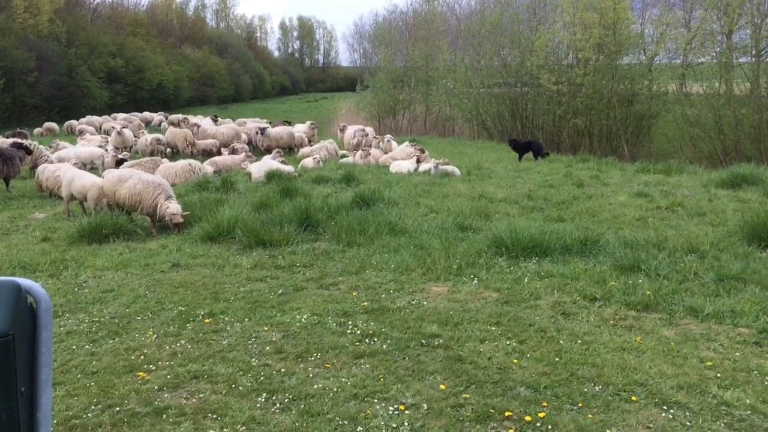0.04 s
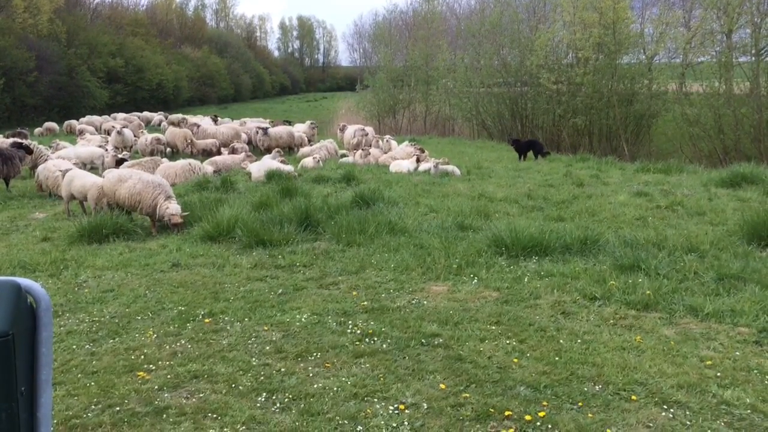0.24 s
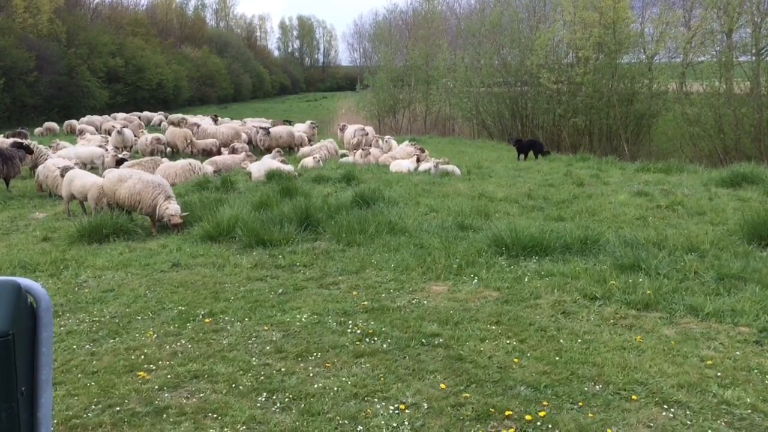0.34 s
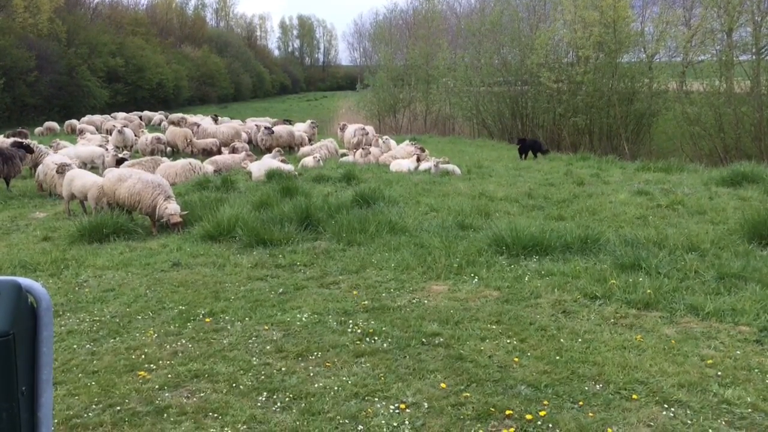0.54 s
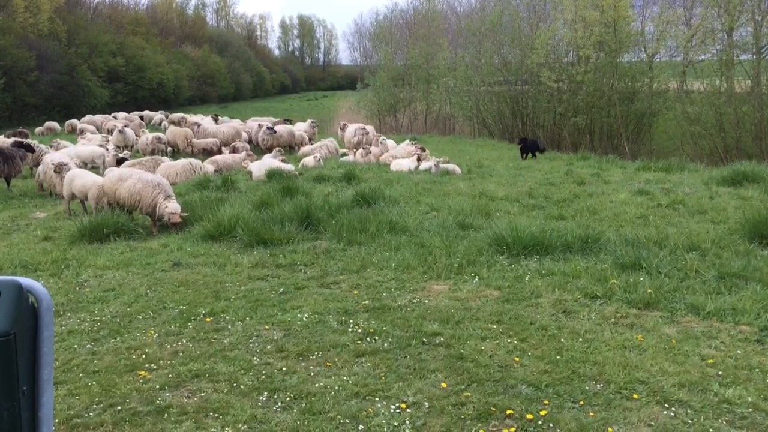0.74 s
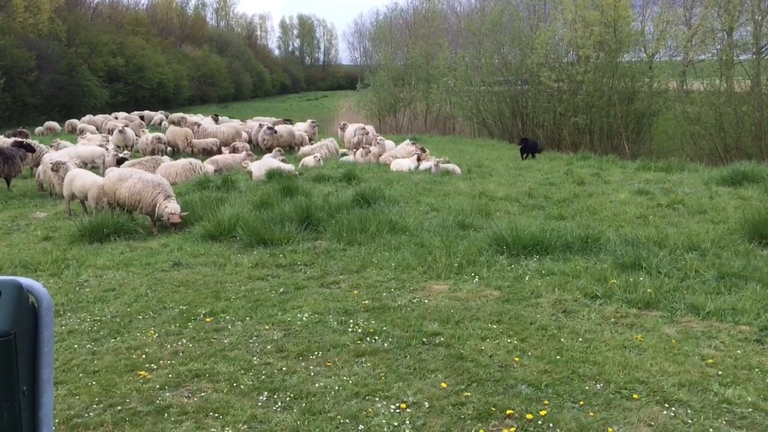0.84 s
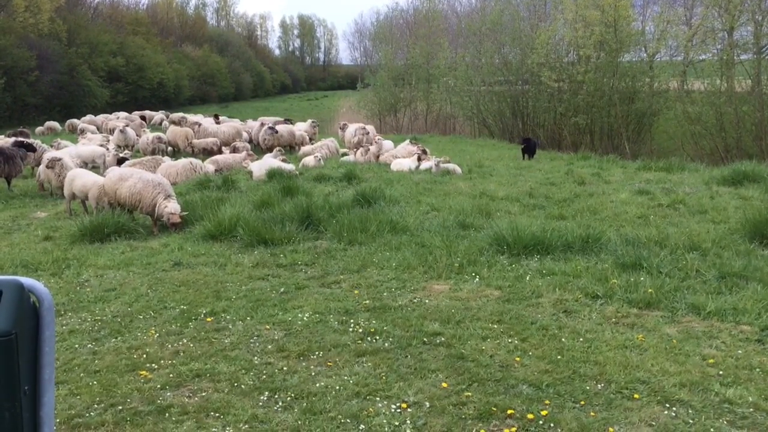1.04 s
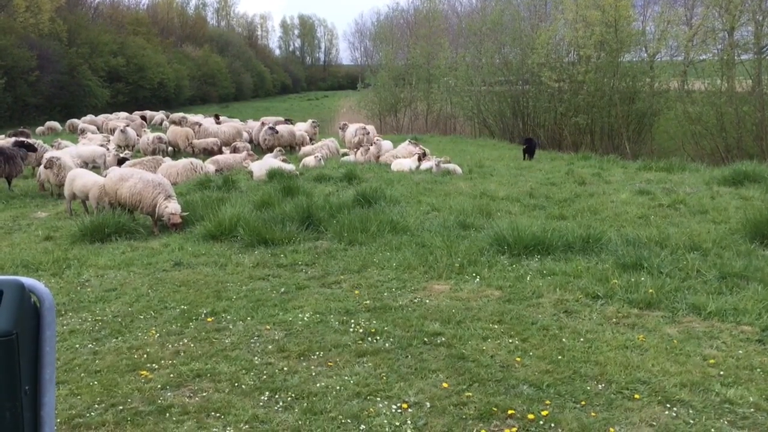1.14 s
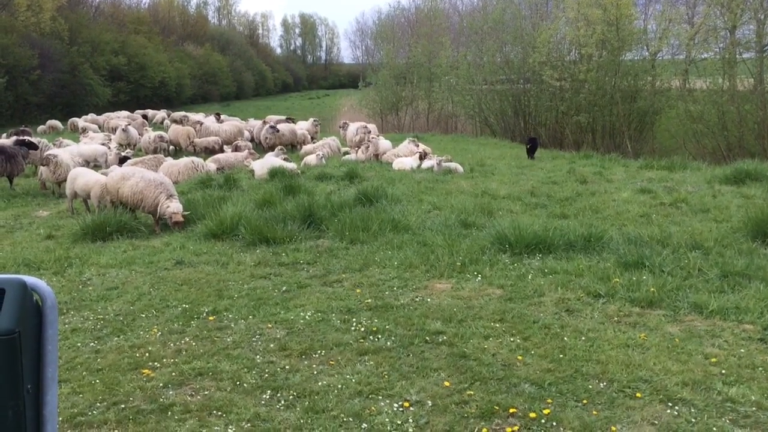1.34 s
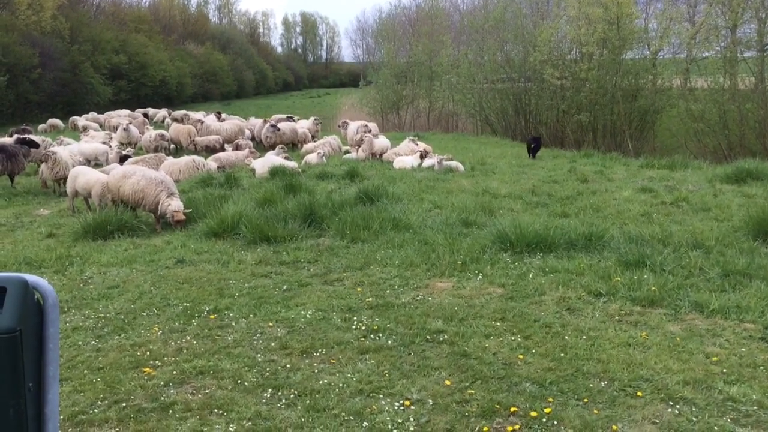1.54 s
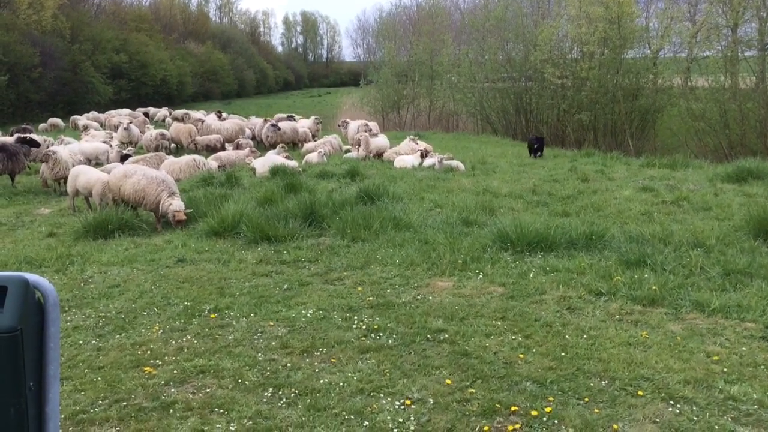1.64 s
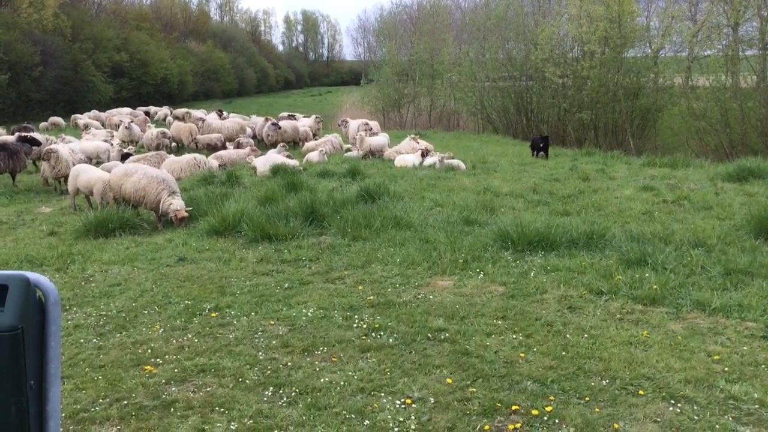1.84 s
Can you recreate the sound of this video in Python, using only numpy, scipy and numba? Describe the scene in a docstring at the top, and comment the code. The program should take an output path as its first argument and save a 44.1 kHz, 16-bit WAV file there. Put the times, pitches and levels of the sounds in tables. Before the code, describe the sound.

One long sheep bleat turns hoarse as it fades in a quiet, breezy meadow.

```python
"""An open meadow, where a sheep gives one long, low bleat.
Sharp pulses from its vocal folds ring three resonances in its throat. The voice is clear and
quavering at first, then breaks into a weaker, hoarse rattle, and the tree line sends back a faint tail.
Light wind rumbles on the microphone, the grass rustles and a far bird chirps."""
import sys
import numpy as np
from scipy import signal
from scipy.io import wavfile
from scipy.ndimage import uniform_filter1d
from numba import njit

SR = 44100
rng = np.random.default_rng(int(sys.argv[2]) if len(sys.argv) > 2 else 0)


def bounce(signal):
    """Save signal as a 16-bit WAV file at the path given by the first command-line argument."""
    frames = np.transpose(np.atleast_2d(signal))
    limited = np.clip(frames, -1, 1)
    pcm = np.round(limited * 32767).astype(np.int16)
    wavfile.write(sys.argv[1], SR, pcm)


N = 83790


def from_db(db):
    """Turn decibels into a number to multiply by."""
    return 10 ** (np.asarray(db) / 20)


def rms_one(x):
    """Scale a signal to an average power of one."""
    return x / np.sqrt(np.mean(x ** 2) + 1e-20)


def seconds():
    """The time of every sample."""
    return np.arange(N) / SR


def in_time(rows):
    """Join a table's rows by straight lines: one curve for each column after the time."""
    times, *columns = np.transpose(rows)
    return [np.interp(seconds(), times, column) for column in columns]


def drift(rate):
    """A random wander of size about one, with a new value `rate` times a second."""
    return rms_one(np.interp(seconds() * rate, np.arange(4000), rng.standard_normal(4000)))


def butter(x, hz, kind, order=2):
    """Keep the lows, the highs or a band; a higher order cuts more steeply."""
    return signal.sosfilt(signal.butter(order, np.clip(hz, 10, .45 * SR), kind, fs=SR, output="sos"), x)


@njit
def glide_filter(x, angle, r):
    """A ringing filter: `angle` sets its pitch, and `r` nearer to one makes it ring longer."""
    y = np.zeros(len(x))
    for i in range(2, len(x)):
        push = (1 - r[i] ** 2) / 2 * (x[i] - x[i - 2])
        y[i] = push + 2 * r[i] * np.cos(angle[i]) * y[i - 1] - r[i] ** 2 * y[i - 2]
    return y


def resonate(x, hz, width_hz):
    """Make a signal ring at a steady or moving frequency; a narrower width rings longer."""
    angle = 2 * np.pi * hz / SR * np.ones(N)
    r = np.exp(-np.pi * np.abs(width_hz) / SR) * np.ones(N)
    return glide_filter(x + 1e-18, angle, r)


# the breeze's tone, from deep rumble to high hiss (frequency [Hz], relative level per Hz [dB])
BREEZE_TONE = [(20, -58), (40, -7.5), (68, 1), (100, -1), (160, -2.5), (250, -8.5), (400, -11), (700, -14),
               (1300, -19), (2200, -25), (4000, -30.5), (6000, -33), (8300, -33), (10000, -37),
               (15000, -40)]


def breeze(level_db=-58.5, flutter_db=0.7):
    """Wind rumbles and leaves hiss: twenty bands of noise, each fluttering gently."""
    edges = 20 * 2 ** (np.arange(21) / 2)
    noise = rng.standard_normal((2, 2 * N))
    hz, db = np.transpose(BREEZE_TONE)
    out = np.zeros(N)
    for k, (low, high) in enumerate(zip(edges, edges[1:])):
        band = butter(noise[k % 2], [low, high], "band")[N:]
        band_db = np.interp(np.log(low * high) / 2, np.log(hz), db)
        out += band * from_db(band_db + flutter_db * drift(20))
    return from_db(level_db) * rms_one(out)


# the tones of a far-off hum (pitch [Hz], level [dB])
HUM_TONES = [(196, -81), (331, -75.5), (395, -76)]


def far_hum():
    """Faint, steady tones whose pitch wanders a little."""
    return sum(from_db(db) * np.sqrt(2) * np.sin(2 * np.pi * np.cumsum(hz + 3 * drift(15)) / SR)
               for hz, db in HUM_TONES)


# the calls of a far bird (time [s], peak level [dB], pitch [Hz])
BIRD_CHIRPS = [(.035, -75, 7500), (.075, -75, 8400), (.355, -76, 6400)]


def bird(half_length_s=0.0092, warble_hz=160):
    """A far bird gives short, very high, warbling whistles."""
    out = np.zeros(N)
    for time, db, hz in BIRD_CHIRPS:
        swell = np.exp(-((seconds() - time) / half_length_s) ** 2)
        pitch = hz + warble_hz * drift(160)
        out += from_db(db) * swell * np.sin(2 * np.pi * np.cumsum(pitch) / SR)
    return out


# stirs in the grass (time [s], level [dB], half length [s], band centre [Hz], top edge / centre [ratio])
GRASS_RUSTLES = [(0.038, -66, 0.0018, 7100, 0.9), (.256, -62.5, 0.0018, 6100, 1.05),
                 (0.253, -80, .03, 8000, 0.93), (0.59, -67, 0.0036, 13000, 2.2),
                 (.692, -70.5, 0.024, 7000, 1.9), (1.134, -70, 0.069, 3560, 1),
                 (1.144, -73, 0.0024, 4358, 1.13), (1.11, -75, 0.032, 12000, 1.3),
                 (1.274, -72, 0.016, 9070, 1.5), (1.359, -70, 0.014, 3000, 0.8),
                 (1.42, -74.5, 0.023, 5467, 1.7), (1.58, -75, 0.0094, 7610, 1),
                 (1.663, -68.5, .002, 6000, 1.9)]


def grass(grain_db=4):
    """The grass rustles in short swells of bright, grainy noise."""
    out = np.zeros(N)
    for time, db, half_length, hz, spread in GRASS_RUSTLES:
        grains = rng.standard_normal(N) * from_db(grain_db * drift(600))
        spread = max(spread, 1.15)
        rustle = rms_one(butter(grains, [hz / spread, hz * spread], "band", order=1))
        swell = np.exp(-((seconds() - time) / half_length) ** 2)
        out += from_db(db) * swell * rustle
    return out


# puffs of wind on the microphone (time [s], peak level [dB])
WIND_PUFFS = [(.108, -49), (0.788, -54), (1.219, -51), (1.36, -49), (1.602, -51.5), (1.77, -47)]


def wind_bumps(pitch_hz=84.6, half_length_s=0.0099):
    """Each puff of wind bumps the microphone, making a brief, low thud."""
    out = np.zeros(N)
    for time, db in WIND_PUFFS:
        t = seconds() - time
        swell = np.exp(-(t / half_length_s) ** 2)
        out += from_db(db) * swell * np.sin(2 * np.pi * (pitch_hz * t + rng.random()))
    return out


BLEAT_START_S, BLEAT_END_S = .185, 1.365
# how fast the sheep's vocal folds pulse (time [s], pitch [Hz])
FOLD_PITCH = [(0.185, 121.7), (0.249, 137.5), (0.271, 135.9), (0.317, 146.8), (0.355, 139.1),
              (0.401, 142.6), (0.437, 139.1), (0.495, 145.3), (0.531, 139.1), (0.589, 146.5),
              (0.625, 135.8), (0.671, 146.9), (0.707, 137.8), (0.751, 144.1), (0.797, 142.3),
              (0.851, 128.5), (0.891, 136.1), (0.903, 134.1), (0.945, 123.7), (0.985, 133.2),
              (1.015, 129.8), (1.049, 136.2), (1.105, 137), (1.173, 134.2), (1.219, 123.5), (1.245, 113.9),
              (1.297, 121.8), (1.35, 115.5)]
# how rough the voice is (time [s], hoarseness [0-1])
HOARSENESS = [(.19, 0.2), (.32, 0.15), (.57, .1), (.62, .17), (.69, 0.25), (.78, 0.11), (.83, 0.46),
              (1.0, 0.53), (1.1, 0.28), (1.24, .52), (1.34, 0.63)]


def vocal_folds(timing_spread=.025, strength_spread_db=2, rasp=.75, puff_cycles=.9):
    """The folds click once a cycle; hoarseness makes the clicks uneven and adds a puff of air to each."""
    pitch, = in_time(FOLD_PITCH)
    hoarse, = in_time(HOARSENESS)
    cycles = np.cumsum(pitch * (seconds() > BLEAT_START_S)) / SR
    starts = np.flatnonzero(np.diff(np.ceil(cycles)) > 0)
    puffs = rng.standard_normal(N) * np.exp(-(cycles % 1) / puff_cycles)
    timing, strength = hoarse[starts] * rng.standard_normal((400, 2))[:len(starts)].T
    shifted = starts + timing_spread * timing * SR / pitch[starts]
    clicks = np.zeros(N)
    clicks[np.clip(shifted, 0, N - 1).astype(int)] = from_db(strength_spread_db * strength)
    return rms_one(clicks) + rasp * hoarse * rms_one(puffs)


# how hard the sheep calls (time [s], effort [dB])
VOICE_EFFORT = [(0.18, -67), (0.186, -63.5), (0.236, -51.5), (0.258, -53.5), (0.322, -45), (0.5, -39.5),
                (0.518, -44), (0.584, -39), (0.61, -42), (0.72, -42), (0.746, -45), (0.778, -40.5),
                (0.836, -50), (0.848, -43.5), (0.868, -51), (0.878, -47.5), (0.948, -49), (0.954, -53),
                (0.998, -47), (1.004, -53), (1.074, -48.5), (1.332, -53.5), (1.37, -57)]
# the three resonances, or rings, of the throat and mouth (time [s], first [Hz], second [Hz], third [Hz])
THROAT_RINGS = [(.185, 620, 1175, 1380), (0.238, 600, 1317, 1600), (.36, 658, 1302, 1693),
                (.58, 647, 1318, 1743), (.79, 632, 1307, 1730), (.96, 624, 1317, 1800),
                (1.11, 630.8, 1320, 1850), (1.32, 606, 1305, 1935)]
# ring widths: the lower two narrow as the voice weakens (time [s], first [Hz], second [Hz], third [Hz])
RING_WIDTHS = [(.25, 99, 71, 166), (.4, 111, 115, 95), (.78, 106.5, 107, 99), (.9, 51, 59.98, 118),
               (1.32, 31, 53, 104)]
# how strong the other rings are next to the second (time [s], first [dB], third [dB])
RING_LEVELS = [(.19, -22, -10.5), (.28, -21, -5.5), (.34, -5.5, -2.5), (.58, -7, -1), (.79, -6, -2.5),
               (.95, -4, -7.5), (1.12, -6.5, -10), (1.24, -4.5, -8), (1.31, 1.5, -7.5)]
# weak, steady rings of the nose and mouth
# (frequency [Hz], width [Hz], relative level at full effort [dB], change with effort [dB per dB])
NOSE_RINGS = [(2220, 280, -23, -.25), (2920, 220, -21, .9)]


def bleat(full_effort_db=-40, gain_db=0.6, buzz_db=-40.5, fade_s=0.042):
    """The pulses ring the throat and nose; effort sets the loudness and brings out the highest ring."""
    pulses = vocal_folds()
    first, second, third = [resonate(pulses, hz, width)
                            for hz, width in zip(in_time(THROAT_RINGS), in_time(RING_WIDTHS))]
    first_db, third_db = in_time(RING_LEVELS)
    upper_rings = from_db(third_db) * third - second
    effort_db, = in_time(VOICE_EFFORT)
    push_db = np.clip(effort_db - full_effort_db, -12, 3)
    nose = sum(sign * from_db(db + change * push_db) * resonate(pulses, hz, width)
               for sign, (hz, width, db, change) in zip((-1, 1), NOSE_RINGS))
    voice = from_db(first_db) * first + upper_rings + nose
    voice = butter(voice, hz=2340, kind="low", order=4)
    voice = butter(voice, hz=524, kind="high", order=7)
    # even out the voice, so that its loudness follows the effort
    power = uniform_filter1d(uniform_filter1d(upper_rings ** 2, size=900), size=600)
    voice /= np.sqrt(np.abs(power) + 1e-9)
    # a faint, high buzz in step with the pulses
    buzz = butter(np.abs(upper_rings) * rng.standard_normal(N), hz=[3580, 9000], kind="band")
    fade = np.clip((BLEAT_END_S - seconds()) / fade_s, 0, 1) * (seconds() > BLEAT_START_S)
    return (voice + from_db(buzz_db) * rms_one(buzz)) * fade * from_db(effort_db + gain_db)


# echoes from the flock and the trees (delay [s], level next to the voice [dB])
MEADOW_ECHOES = [(.047, -12.5), (.11, -14.5), (.2, -19.5)]


def meadow_echoes(voice, tail_db=-7, tail_delay_s=0.036, fade_60_db_s=1.36):
    """The bleat bounces back as a few dull echoes and a faint tail scattered by the tree line."""
    t = seconds()
    scatter = rng.standard_normal(N) * from_db(-60 * t / fade_60_db_s) * (t > tail_delay_s)
    scatter /= np.sqrt(np.sum(scatter ** 2))
    tail = from_db(tail_db) * signal.fftconvolve(voice, scatter)[:N]
    echoes = sum(from_db(db) * np.interp(t - delay, t, voice, left=0) for delay, db in MEADOW_ECHOES)
    return butter(tail, hz=580, kind="low", order=1) + butter(echoes, hz=3100, kind="low")


def scene():
    """The sheep and its echoes over the quiet sounds of the meadow, in one channel."""
    voice = bleat()
    sheep = voice + meadow_echoes(voice)
    background = breeze() + far_hum() + bird() + grass() + wind_bumps()
    return (sheep + background)[None]


def record(dry):
    """Cut away the very highest treble steeply."""
    cutoff_hz = 15250
    return signal.sosfilt(signal.ellip(12, .1, 70, cutoff_hz, fs=SR, output="sos"), dry)


dry = scene()
out = record(dry)
bounce(out)
```